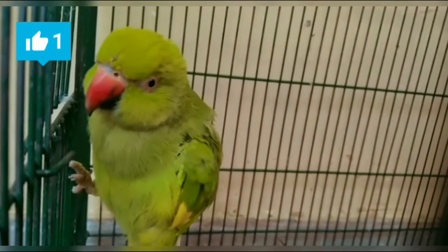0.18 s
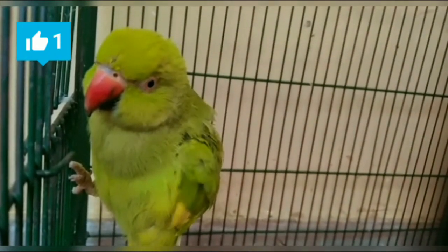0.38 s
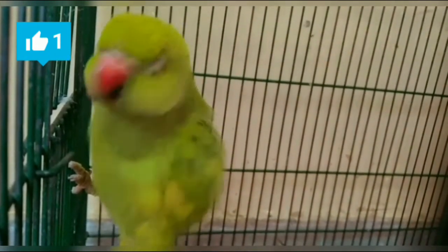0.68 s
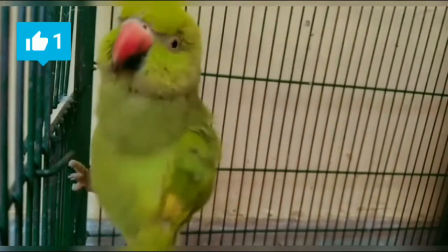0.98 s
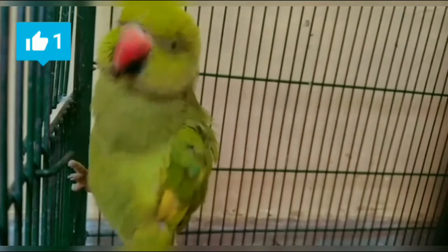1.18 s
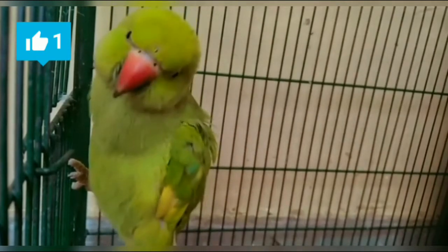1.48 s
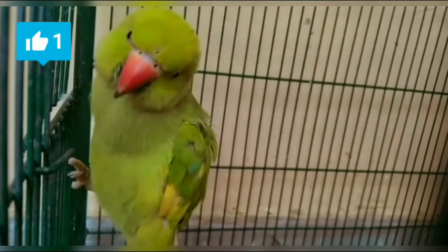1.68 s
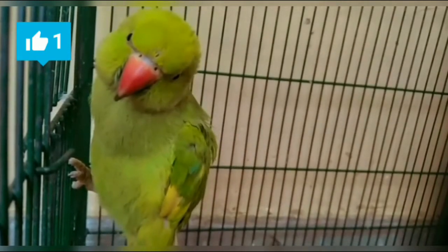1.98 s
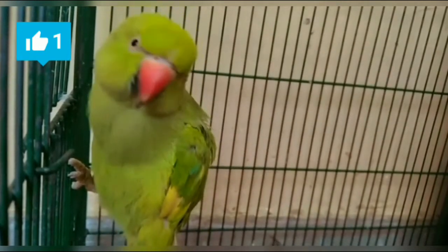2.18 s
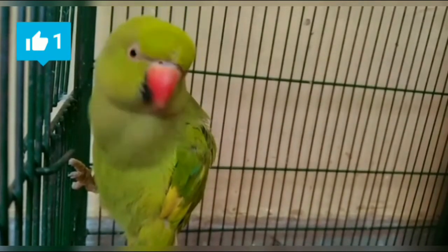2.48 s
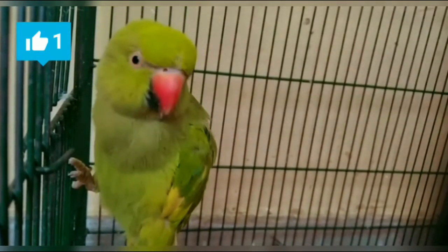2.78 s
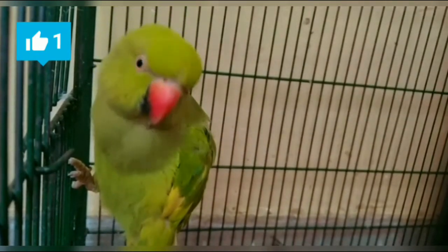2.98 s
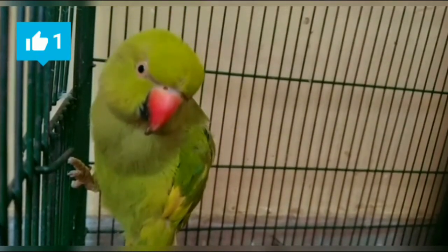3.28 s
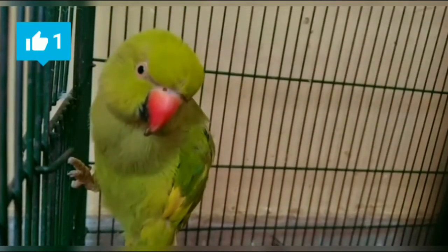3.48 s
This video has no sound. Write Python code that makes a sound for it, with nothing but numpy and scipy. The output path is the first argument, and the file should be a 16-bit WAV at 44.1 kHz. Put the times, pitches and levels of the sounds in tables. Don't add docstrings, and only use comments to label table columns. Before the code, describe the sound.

A parakeet close by, slightly left, squeals nasally at 0.2-0.7 s, mutters at 0.85, squawks at 1.0, yaps at 1.2, screeches harshly at 1.35 and whines downward at 1.5-1.8. A distant, echoing left songbird trills, twitters from 1.1, then warbles buzzily until 2.6. From 2.1 a right songbird swoops and chirps, sinking away by 3.4, amid five hollow clucks and cage ticks. Low fan hum fills the hard room.

```python
import sys
import numpy as np
from scipy import signal
from scipy.fft import rfft, irfft
from scipy.io import wavfile
from scipy.ndimage import uniform_filter1d

SR = 44100
rng = np.random.default_rng(int(sys.argv[2]) if len(sys.argv) > 2 else 0)


def int16_out(signal):
    q = np.round(np.clip(np.atleast_2d(signal).T, -1, 1) * 32767)
    wavfile.write(sys.argv[1], SR, q.astype(np.int16))


def voltage_ratio(decibels):
    exponent = np.asarray(decibels, float) / 20
    return 10 ** exponent


N = 158760

# f/Hz, level/dB per Hz
HUM_SPECTRUM = [(25, -31), (60, 4), (85, -4.5), (125, 7), (172, 1), (231, -10), (330, 0.5), (520, -35.5)]
# f/Hz, level/dB per Hz
AIR_SPECTRUM = [(300, -22), (420, -11), (900, -3), (1500, -9), (4900, -25), (7200, -37), (15500, -61)]

# t/s, length/s, first f/Hz, last f/Hz, level/dB
LEFT_NOTES = [(.883, 0.02, 7500, 5930, -49), (.91, 0.015, 6500, 6820, -35.5),
              (1.855, 0.031, 3840, 2300, -30), (1.905, 0.011, 2365, 3334, -31),
              (1.929, 0.0085, 6370, 5400, -34.5), (2.08, 0.035, 3480, 2293, -32.5),
              (2.31, 0.037, 3813, 2400, -32), (3.515, 0.0064, 3880, 4380, -40.5),
              (3.538, 0.007, 4500, 3380, -38)]
TRILLS = [
    (0.59, .16, 6200, 6800, -55.5),
    (1.1, 0.49, 6300, 5800, -51),
    (.46, 0.064, 4900, 5700, -40.5),
    (.71, 0.11, 5380, 5120, -36.5),
    (.95, 0.122, 5400, 5000, -37),
]
WARBLES = [(1.76, 0.093, 4690, 3790, -29.5), (1.785, 0.04, 6760, 5780, -37.5),
           (1.81, 0.02, 5600, 4385, -29.5), (2.0, 0.053, 5500, 4820, -34.5),
           (2.012, 0.033, 7360, 6290, -40), (2.045, 0.067, 4500, 3900, -27.5),
           (2.255, 0.048, 7230, 5510, -40), (2.283, 0.038, 4610, 3880, -29), (2.545, .03, 3336, 3670, -30)]

# t/s after its start, f/Hz, level/dB
CHIRP_SHAPE = [
    (0, 3980, -10.5),
    (.007, 4844, -11),
    (.014, 3770, -1.15),
    (0.035, 2800, -5.5),
    (.045, 1723, -25.5),
]
# t/s, level/dB
CHIRP_TIMES = [
    (2.225, -8.5),
    (2.363, -8.5),
    (2.5, -8.5),
    (2.63, -8),
    (2.762, -8.5),
]
# t/s from the chirp, length/s, first f/Hz, last f/Hz, level/dB from the chirp
CHIRP_PICKUPS = [
    (-.041, .02, 6600, 5800, -29),
    (-.022, .016, 4300, 5450, -25),
]
# t/s, length/s, first f/Hz, last f/Hz, level/dB
SWOOPS = [
    (2.182, 0.0197, 2870, 3675, -20),
    (2.86, 0.0256, 2423, 2820, -24.5),
    (3.018, 0.037, 6580, 3840, -31.5),
    (3.052, .012, 2520, 3416, -21.5),
    (3.18, 0.0185, 2230, 3274, -22.5),
    (3.2, 0.036, 3393, 5026, -22),
]
# t/s, length/s, first f/Hz, last f/Hz, level/dB
SLIDES = [(2.135, 0.0053, 2360, 3100, -26.5), (2.54, 0.017, 3400, 4380, -53),
          (2.879, 0.0034, 3330, 2760, -21), (2.885, 0.055, 2603, 1830, -31.5),
          (3.057, 0.0314, 3470, 3260, -17.5), (3.09, 0.016, 3376, 1830, -25),
          (3.228, 0.0084, 4930, 3240, -25), (3.241, 0.013, 5270, 3260, -20.5),
          (3.253, 0.0036, 5090, 3170, -22)]

# t/s, peak level/dB, f/Hz, rasp level/dB
CLUCKS = [
    (2.4069, -13.5, 1087, -34.5),
    (2.6359, -10, 1093, -25),
    (2.8562, -9.5, 1160, -28),
    (3.0854, -7.5, 1313, -22),
    (3.302, -9, 1172, -28),
]
# t/s, level/dB, top f/Hz
WIRE_TICKS = [
    (1.049, -25, 15000),
    (1.354, -23, 15000),
    (1.594, -31, 15000),
    (2.452, -12, 1900),
    (2.833, -24, 1500),
    (2.385, -26, 1500),
]

# t/s, pitch f/Hz, level/dB
SQUEAL = [(0.16, 470, -49), (0.231, 605.3, -23), (0.278, 718, -15.5), (0.317, 736.4, -16),
          (0.452, 708.2, -12), (0.6, 684.3, -12.5), (0.661, 662, -13), (.69, 627, -11.5),
          (0.701, 574, -27.5)]
MUTTER = [
    (0.84, 599, -38),
    (.865, 542.5, -30.5),
    (0.902, 510, -25),
    (0.932, 387, -36.5),
]
SQUAWK = [
    (0.979, 427.5, -15),
    (0.99, 505, -19),
    (1.01, 607.3, -12.5),
    (1.038, 567.5, -15),
    (1.058, 609.4, -13),
    (1.085, 434, -19.5),
]
YAP = [
    (1.158, 482, -17),
    (1.172, 545, -14.5),
    (1.186, 580.4, -12),
    (1.197, 495, -15.5),
    (1.209, 398, -18),
]
SCREECH = [
    (1.308, 598.4, -33.5),
    (1.335, 700, -20),
    (1.357, 826.6, -11.5),
    (1.376, 664, -15),
    (1.394, 510, -16),
]
WHINE = [(1.534, 1258, -22.5), (1.57, 1072, -17), (1.595, 945.4, -11.5), (1.632, 790, -14),
         (1.668, 715, -15.5), (1.738, 675.6, -17), (1.779, 688, -22.5), (1.808, 754, -39)]
# brightness/dB per octave, throat shift/octaves, bass cut/dB per octave
VOICING = [
    (0.87, -0.082, 0.3),
    (-24, -1.12, -1.5),
    (-0.5, 0.0076, 0.9),
    (1.6, -0.0071, 1),
    (1.2, 0.16, 3.5),
    (0.6, 0.08, -0.4),
]
# pitch jitter/share, breath noise level/dB
ROUGHNESS = [
    (.002, -26),
    (.008, -19),
    (.005, -18),
    (.008, -14),
    (.016, -7),
    (.004, -17),
]
# f/Hz, level/dB
THROAT = [(550, -6.5), (1400, -6.5), (2200, 1.8), (2850, -6), (3550, -9.5), (4300, -13.5)]
# f/Hz, level/dB
BEAK_SHUT = [(5000, -29), (7000, -31), (7800, -39.5), (9300, -7), (10600, -32), (12000, -26.5),
             (13800, -47), (15200, -33)]
BEAK_OPEN = [(5000, -13.5), (5750, -1), (6600, -19.5), (7900, -10.5), (9000, -55.5), (10000, -36.5),
             (11400, -33.5), (14500, -50)]
# t/s, opening/0-1
GAPE = [(.9, 0.24), (1.0, 0.16), (1.165, .2), (1.2, 0.98), (1.33, 0.47), (1.36, 0.59), (1.54, 0.74),
        (1.585, 0.85), (1.645, 1), (1.7, 0.39)]
# f/Hz, left minus right/dB
PARROT_PAN = [(500, 5.5), (5000, 2.5), (9000, 10)]
# f/Hz, left lead/rad
PARROT_PHASE = [(500, 0.59), (1550, 0.77), (1980, 0.28), (3010, 1.33), (4900, 2), (7490, 0.01), (9000, .4)]


def on_log(hz, table):
    table = np.array(table, float)
    return np.interp(np.log(np.maximum(hz, 1)), np.log(table[:, 0]), table[:, 1])


def walk(rate, size):
    k = max(int(SR / rate), 1)
    white = rng.standard_normal(size + 2 * k)
    smooth = uniform_filter1d(uniform_filter1d(white, k), k)[k:k + size]
    return smooth * np.sqrt(k * 1.51)


def coloured(table, size):
    gain = voltage_ratio(on_log(np.fft.rfftfreq(size, 1 / SR), table))
    x = irfft(rfft(rng.standard_normal(size)) * gain, size)
    return x / np.std(x)


def add(out, x, start):
    i = int(start * SR)
    out[..., i:i + x.shape[-1]] += x[..., :N - i]


def fade(t, edge):
    from_end = np.minimum(t - t[0], t[-1] - t)
    return np.sin(np.pi / 2 * np.clip(from_end / edge, 0, 1))


def panned(x, db):
    return x * voltage_ratio(np.array([[db / 2], [-db / 2]]))


def tone(hz):
    return np.sin(2 * np.pi * np.cumsum(hz) / SR)


def floor():
    out = 0
    for table, db, side_db in ((HUM_SPECTRUM, -45, -16), (AIR_SPECTRUM, -45, -6)):
        middle = coloured(table, N)
        side = voltage_ratio(side_db) * coloured(table, N) * np.array([[1], [-1]])
        out = out + (middle + side) * voltage_ratio(db + 0.16 * walk(5.3, N))
    return out


def room(x, db):
    t60_s, early_t60_s, early_db, predelay_s, top_hz = 1, 0.23, -8.5, 0.0019, 10000
    t = np.arange(SR) / SR
    decay = voltage_ratio(-60 * t / t60_s) + voltage_ratio(early_db - 60 * t / early_t60_s)
    tail = rng.standard_normal((2, SR)) * decay * np.clip(t / predelay_s, 0, 1) ** 2
    tail = signal.lfilter(*signal.butter(2, top_hz, fs=SR), tail)
    tail = tail / np.sqrt(np.sum(tail ** 2) / 2)
    return voltage_ratio(db) * signal.fftconvolve(x[None], tail, axes=1)[:, :N]


def whistles(rows, bend, rate_hz=1., depth_hz=0., throb=0.):
    out = np.zeros(N)
    for s, length, first, last, db in rows:
        t = np.arange(int(length * SR)) / SR
        swing = np.cos(2 * np.pi * np.cumsum(rate_hz * (1 + 0.0475 * walk(54, len(t)))) / SR)
        glide = last + (first - last) * (1 - t / length) ** bend
        hz = glide + depth_hz * (swing + .3 * walk(400, len(t)))
        level = voltage_ratio(db + 5.5 + 0.63 * walk(260, len(t)))
        shape = fade(t, 0.19 * length) * (1 - throb * swing) * level
        add(out, shape * tone(hz), s)
    return out


def left_bird():
    start_s, gap_s, lead_s = 1.139, .0709, .012
    twitter = [(start_s + k * gap_s, .018, 5200, 3700, -30) for k in range(7)]
    grace = [(s - lead_s, 0.298 * n, 6270, last + 400, db - 6) for s, n, _, last, db in twitter]
    out = whistles(LEFT_NOTES, 0.67) + whistles(twitter + grace, 2.37)
    out = out + whistles(TRILLS, 0.99, rate_hz=68, depth_hz=700, throb=0.62)
    return out + whistles(WARBLES, 2.7, rate_hz=250, depth_hz=470, throb=0.13)


def chirps():
    out = np.zeros(N)
    s, hz, db = np.array(CHIRP_SHAPE).T
    t = np.arange(0, s[-1], 1 / SR)
    pitch = uniform_filter1d(np.interp(t, s, hz), size=100)
    for start, level_db in CHIRP_TIMES:
        level = level_db - 0.5 + np.interp(t, s, db) + 2.4 * walk(150, len(t))
        add(out, voltage_ratio(level) * fade(t, 0.00089) * tone(pitch), start)
    return out


def right_bird():
    start_s, gap_s, length_s, high_hz, low_hz = 3.269, .0245, .019, 3600, 2500
    run = []
    for k in range(6):
        sink = 1 - .04 * k
        db = -18 - 2.5 * (k + 2 * (k > 0))
        run.append((start_s + k * gap_s, length_s, high_hz * sink, low_hz * sink, db))
    pickups = [(at + s, n, first, last, db + lead_db)
               for at, db in CHIRP_TIMES[1:] for s, n, first, last, lead_db in CHIRP_PICKUPS]
    out = whistles(SWOOPS, 3.0) + whistles(pickups, 3.0, rate_hz=250, depth_hz=350)
    return out + whistles(SLIDES + run, 1.01) + chirps()


def clucks():
    pop_s, echo_s, rasp_hz = 0.0078, .011, 10820
    out, t = np.zeros(N), np.arange(int(pop_s * SR)) / SR
    for s, db, hz, rasp_db in CLUCKS:
        rasp = voltage_ratio(rasp_db - 1.0) * walk(2500, len(t)) * np.sin(2 * np.pi * rasp_hz * t)
        shape = np.sin(np.pi * (t / pop_s) ** 0.83)
        pop = voltage_ratio(db) * shape * (np.sin(2 * np.pi * hz * t) + rasp)
        add(out, pop, s)
        for k in range(1, 4):
            add(out, pop * voltage_ratio(-20 - 3.9 * (k - 1)), s + k * echo_s)
    for s, db, top_hz in WIRE_TICKS:
        burst = (rng.standard_normal(len(t)) + .6) * np.exp(-t / .0015)
        band = signal.butter(2, (top_hz / 9, top_hz), "band", fs=SR)
        add(out, voltage_ratio(db) * signal.lfilter(*band, burst), s)
    return out


def throat_and_beak(f, shift, gape):
    f = np.where(f < 4300, f * 2 ** -shift, f)
    shut, wide = on_log(f, THROAT + BEAK_SHUT), on_log(f, THROAT + BEAK_OPEN)
    return shut + gape * (wide - shut)


def breath(db, octave, size):
    depth = voltage_ratio(np.minimum(db + 6.5 * np.maximum(octave, 0), 0))
    sides = np.array([walk(1600, size), walk(1600, size)])
    return 1 + depth * (walk(2600, size) + .9 * sides)


def parrot():
    out = np.zeros((2, N))
    calls = (SQUEAL, MUTTER, SQUAWK, YAP, SCREECH, WHINE)
    for curve, (jitter, breath_db), (tilt_db, shift, bass_db) in zip(calls, ROUGHNESS, VOICING):
        s, hz, db = np.array(curve).T
        t = np.arange(s[0], s[-1], 1 / SR)
        size = len(t)
        pitch, level = (uniform_filter1d(np.interp(t, s, v), size=size // 16, mode="nearest")
                        for v in (hz, db))
        wobble = 1 + jitter * (walk(290, size) + walk(39.0, size))
        phase = 2 * np.pi * np.cumsum(pitch * wobble) / SR
        gape = np.clip(np.interp(t, *np.array(GAPE).T), 0, 1)
        bright_db = tilt_db + 0.99 * np.minimum(level - db.max() + 2, 0)
        voice, power = 0, 0
        for k in range(1, 36):
            f = k * pitch
            octave = np.log2(f / 2000)
            tilt = bright_db * np.maximum(octave, 0) + bass_db * np.minimum(octave, 0)
            shimmer = 1.5 * walk(64.4, size)
            gain = voltage_ratio(throat_and_beak(f, shift, gape) + tilt + shimmer) * (f < 16000)
            pan = on_log(f, PARROT_PAN) / 2
            lag = on_log(f, PARROT_PHASE) * np.array([[-.5], [.5]])
            wave = np.sqrt(2) * np.cos(k * phase + .25 * k * k - lag)
            voice = voice - gain * wave * breath(breath_db, octave, size) * voltage_ratio(np.array([pan, -pan]))
            power = power + gain ** 2
        add(out, voice / np.sqrt(power) * voltage_ratio(level) * fade(t, 0.0065), s[0])
    return signal.sosfilt(signal.butter(4, 330, "high", fs=SR, output="sos"), out)


def scene():
    near, pops, left, right = parrot(), clucks(), left_bird(), right_bird()
    wet = room(near.mean(axis=0), -22.5) + room(pops, -23.5) + room(left, 3.5) + room(right, -5)
    direct = near + panned(pops, 5) + panned(left * voltage_ratio(1.5), 7) + panned(right, -4)
    return direct + wet + floor()


def low_pass(x):
    return signal.sosfilt(signal.butter(12, 15900, fs=SR, output="sos"), x)


def record(dry):
    return low_pass(np.clip(dry, -1, 1))


dry = scene()
out = record(dry)
int16_out(out)
```